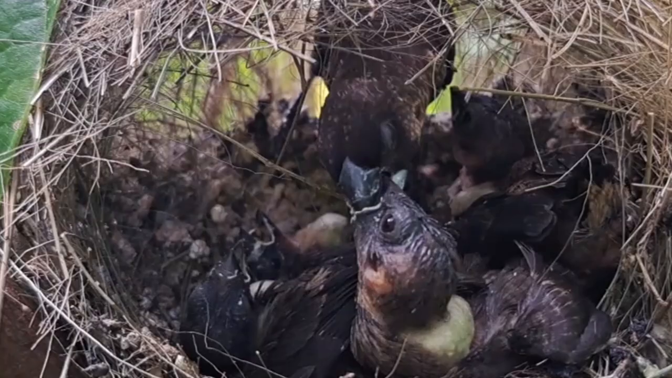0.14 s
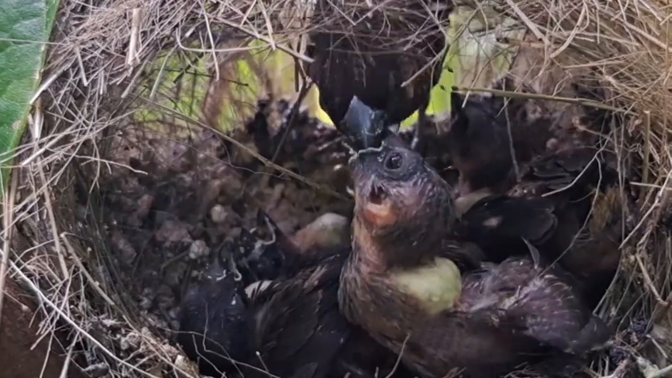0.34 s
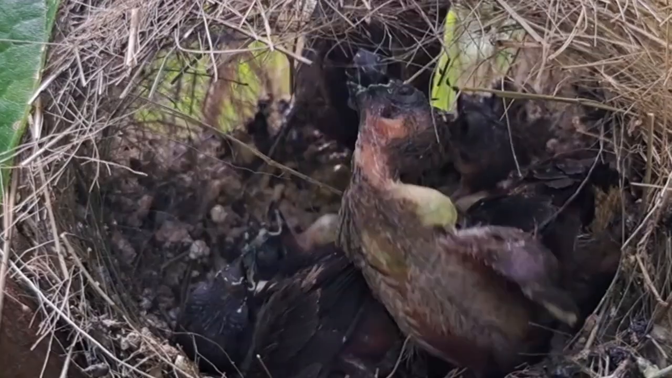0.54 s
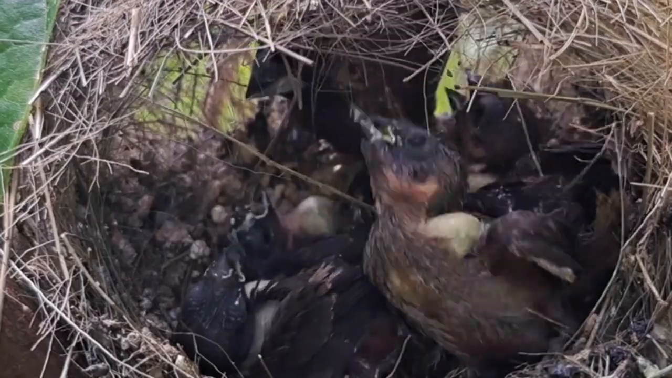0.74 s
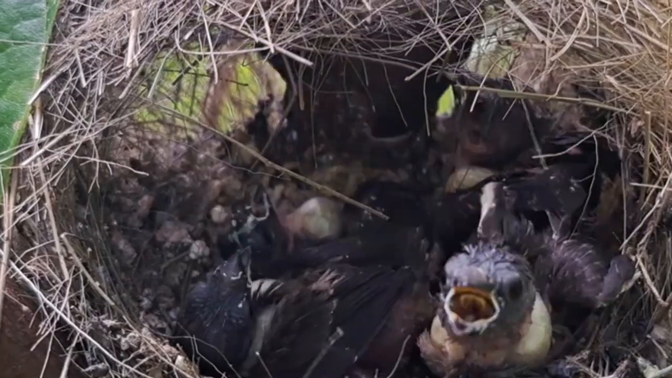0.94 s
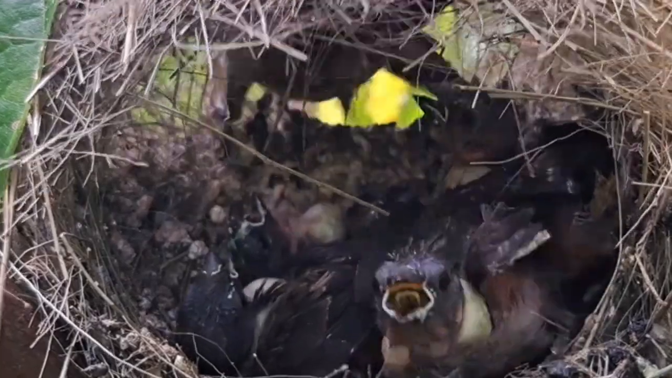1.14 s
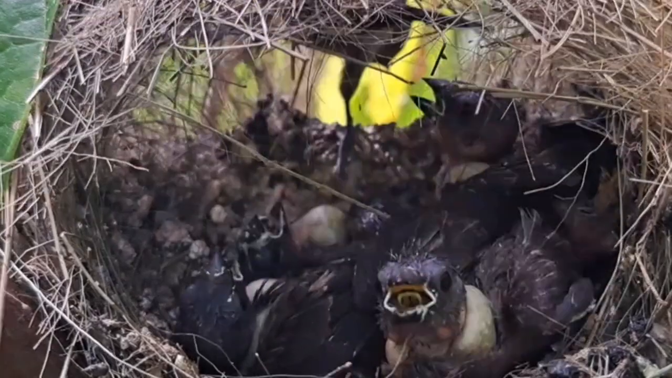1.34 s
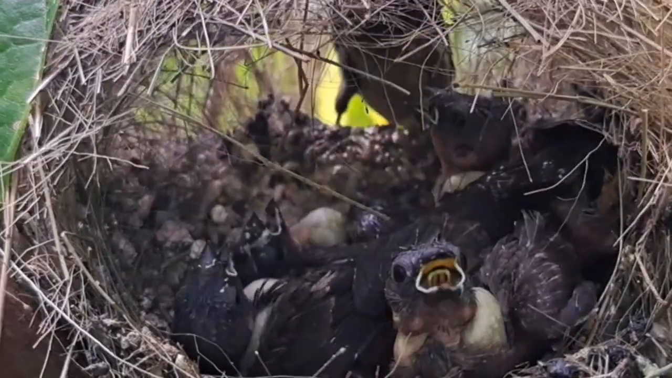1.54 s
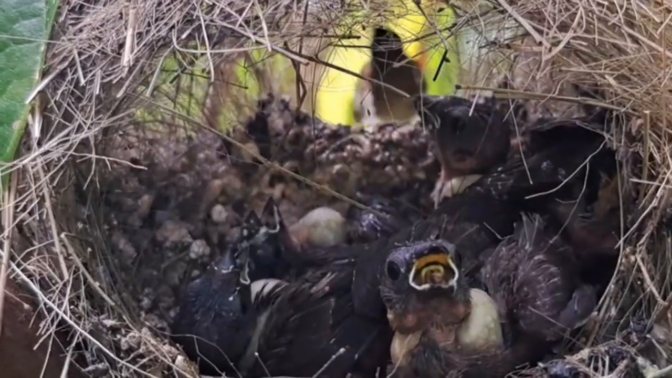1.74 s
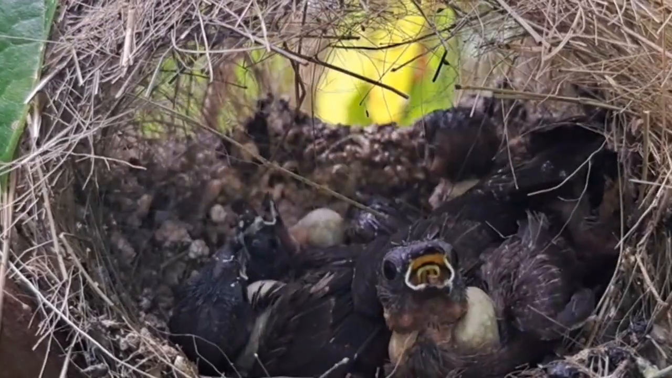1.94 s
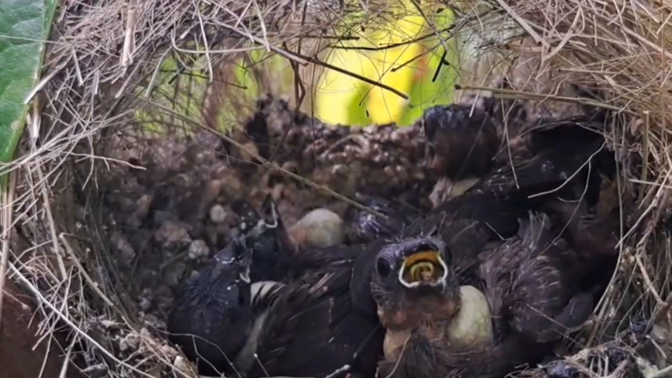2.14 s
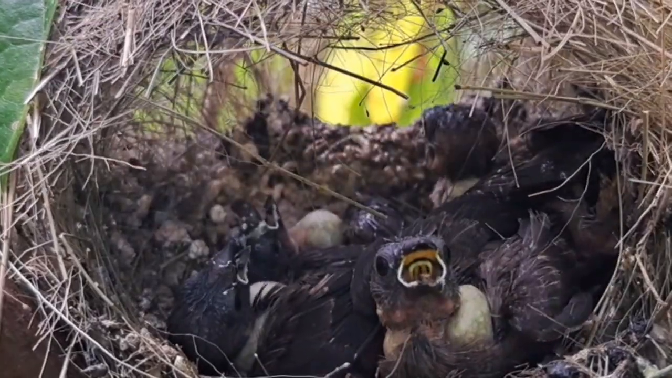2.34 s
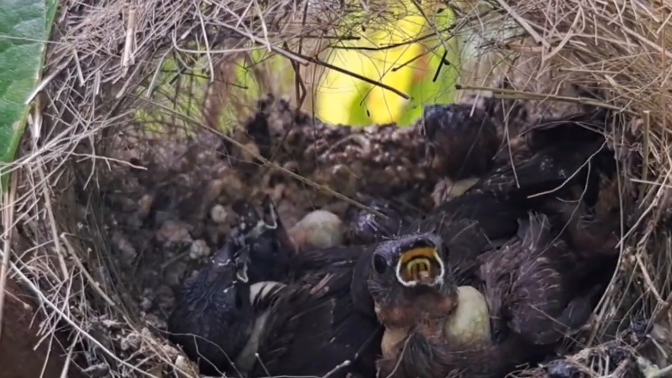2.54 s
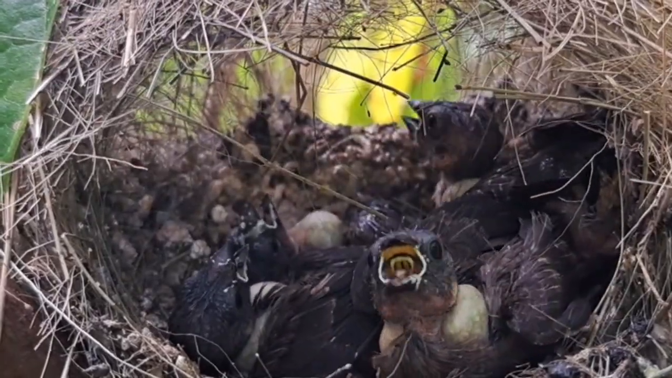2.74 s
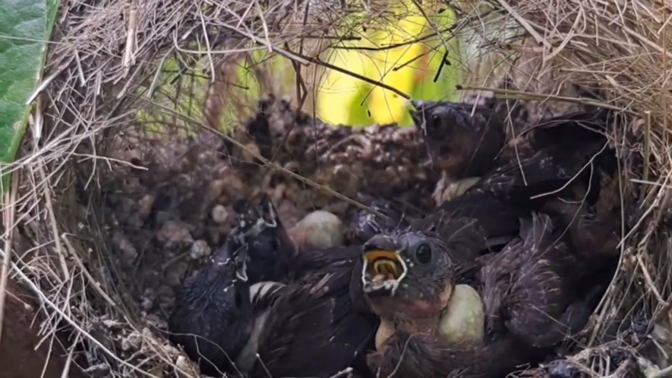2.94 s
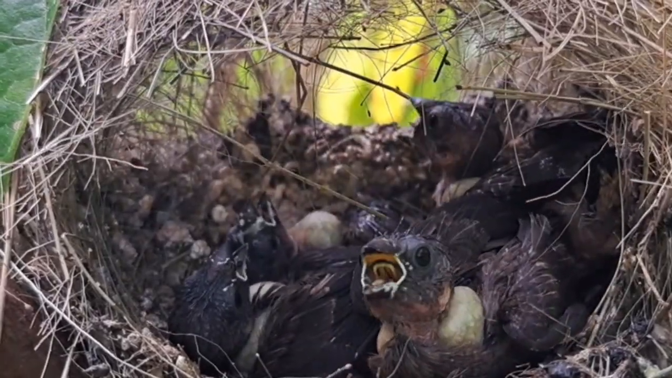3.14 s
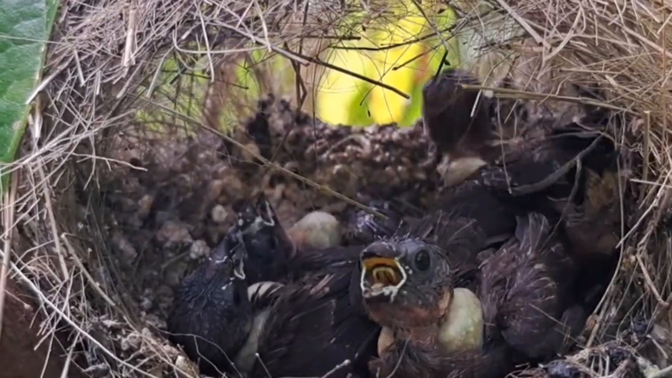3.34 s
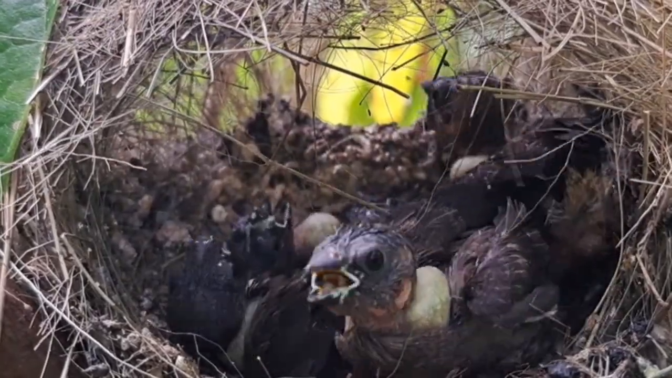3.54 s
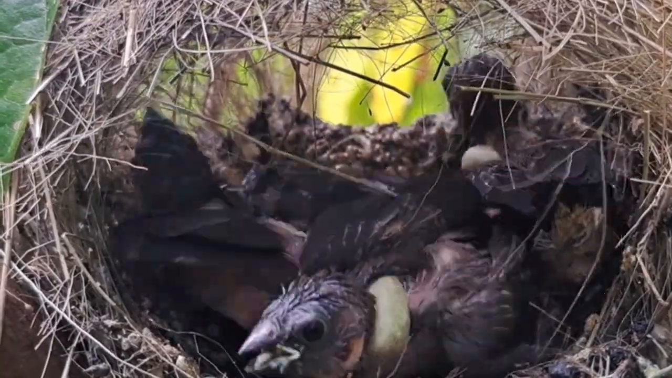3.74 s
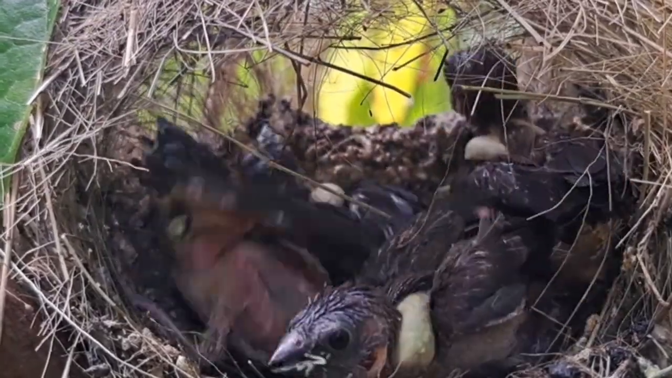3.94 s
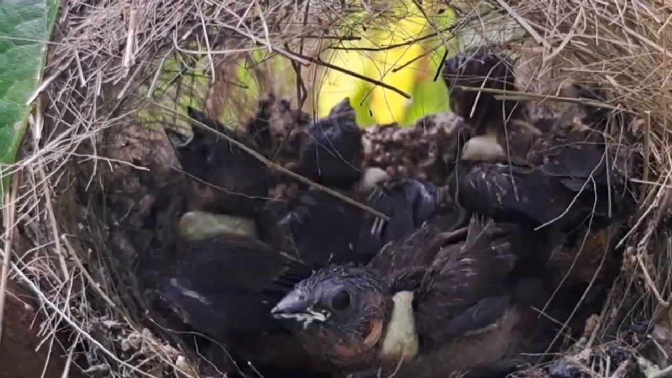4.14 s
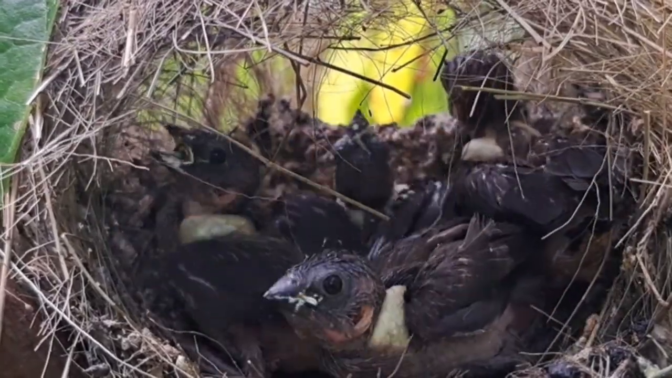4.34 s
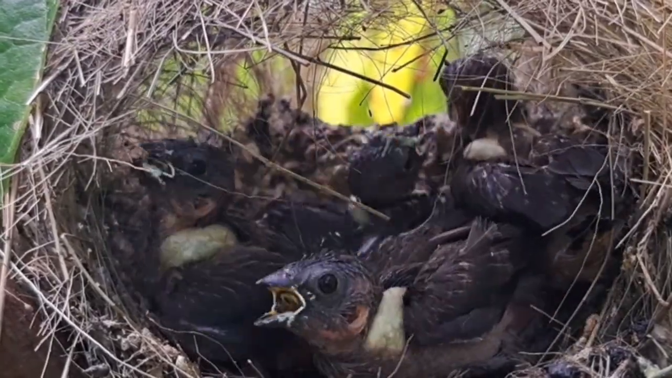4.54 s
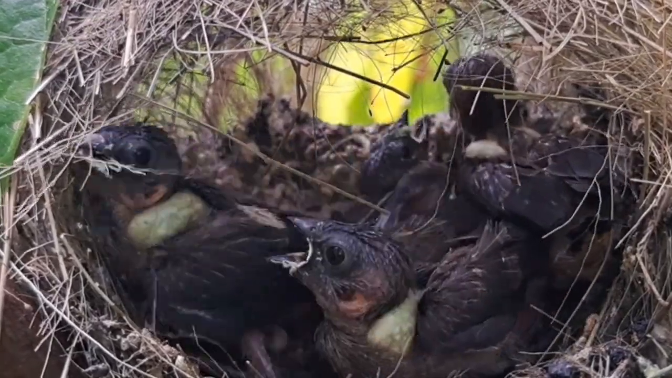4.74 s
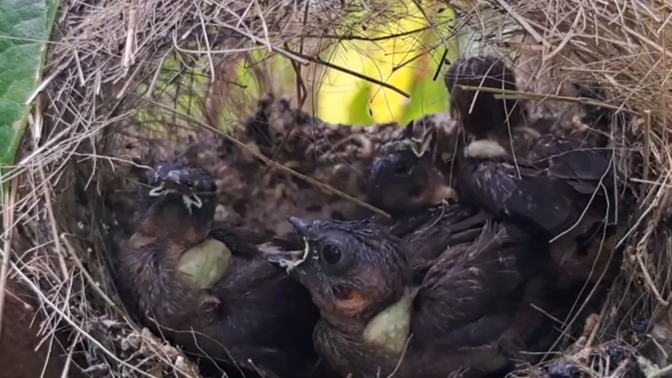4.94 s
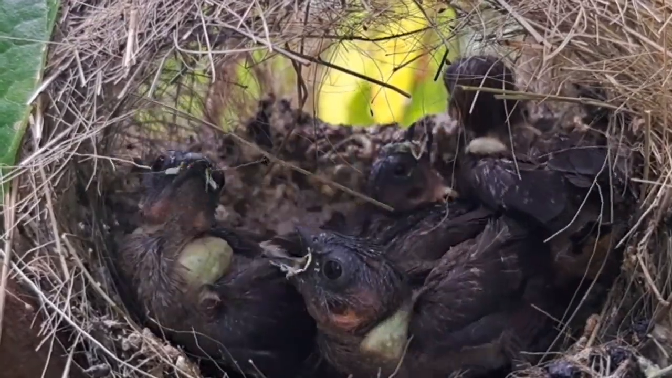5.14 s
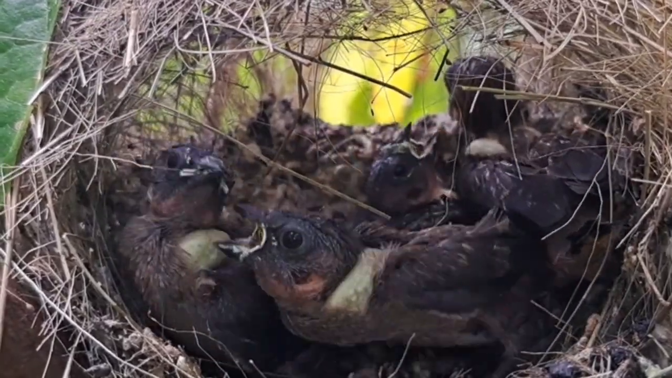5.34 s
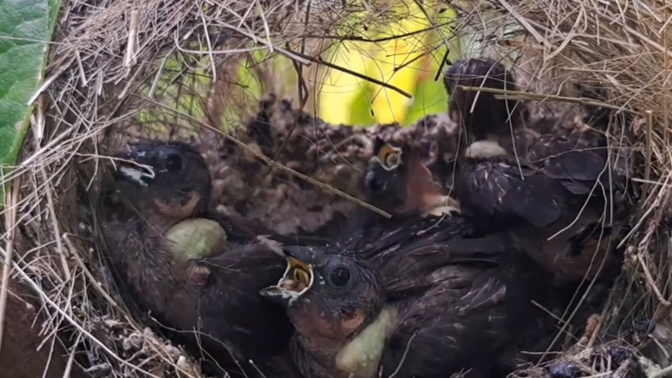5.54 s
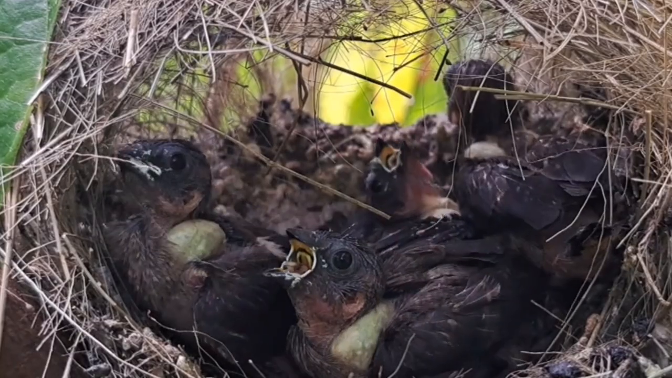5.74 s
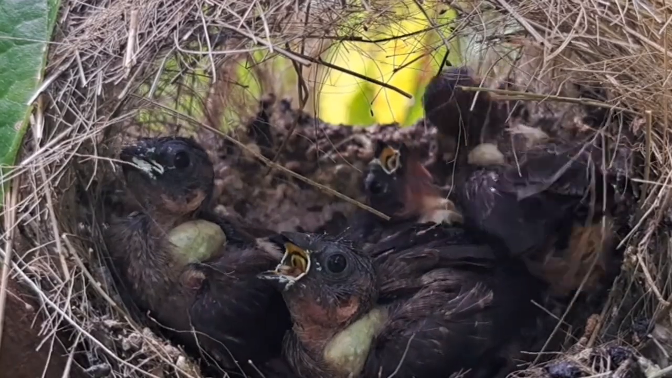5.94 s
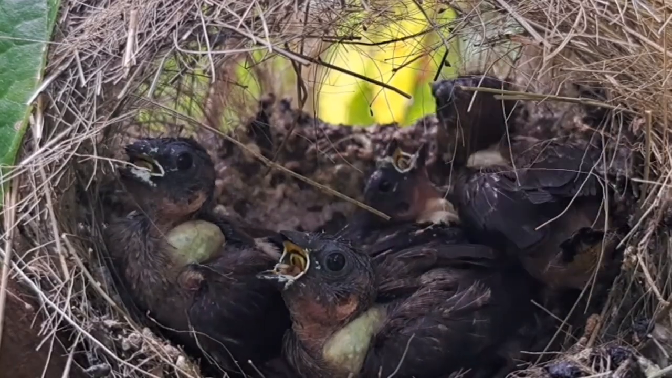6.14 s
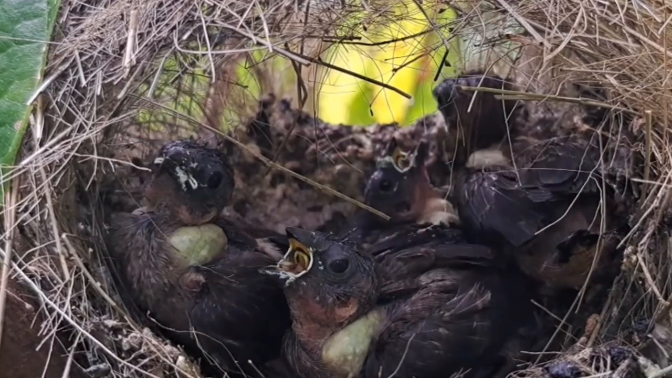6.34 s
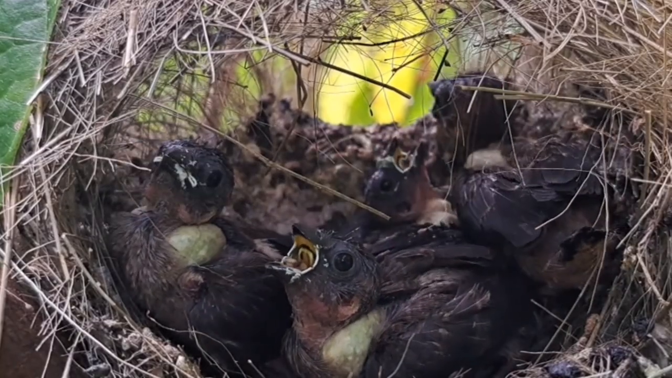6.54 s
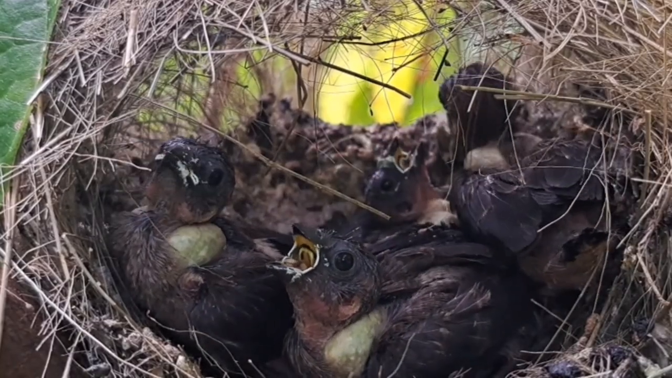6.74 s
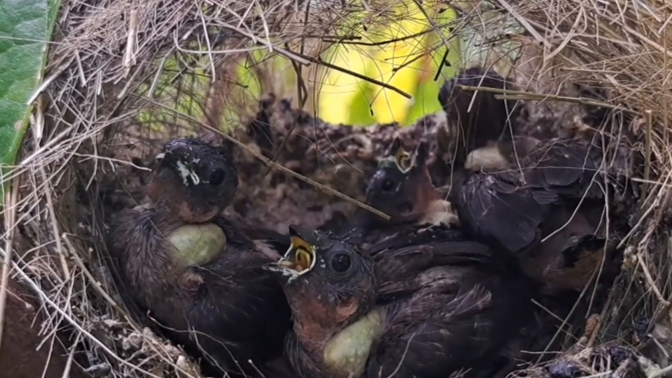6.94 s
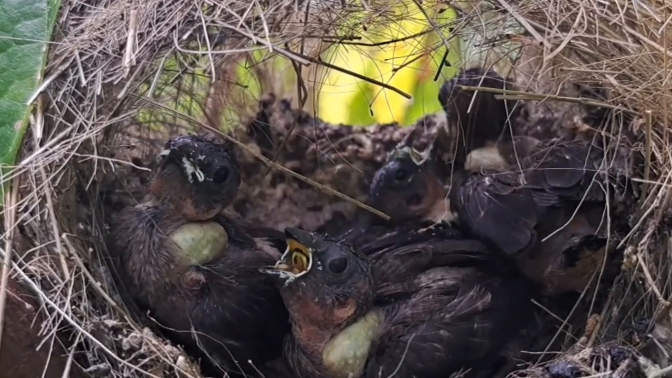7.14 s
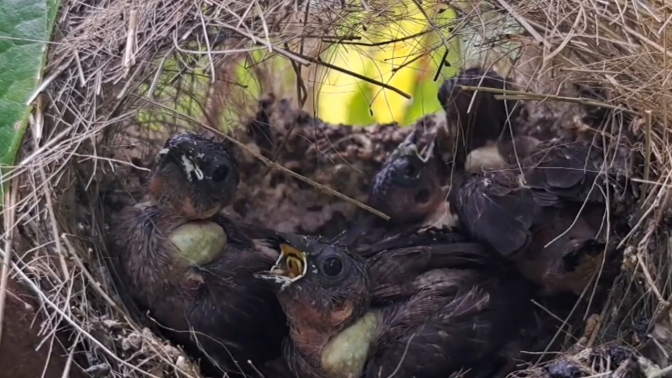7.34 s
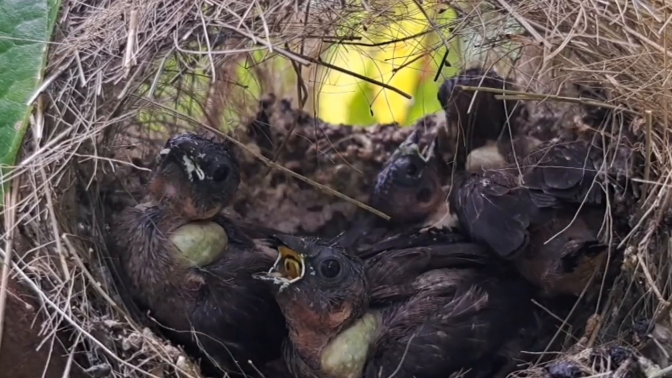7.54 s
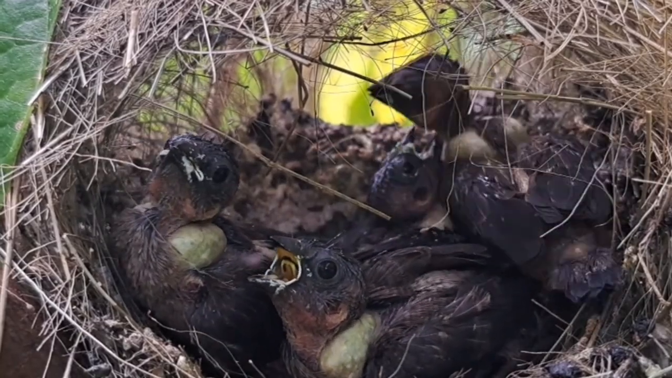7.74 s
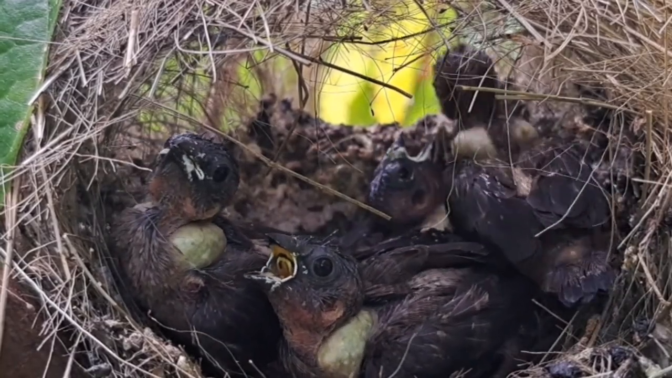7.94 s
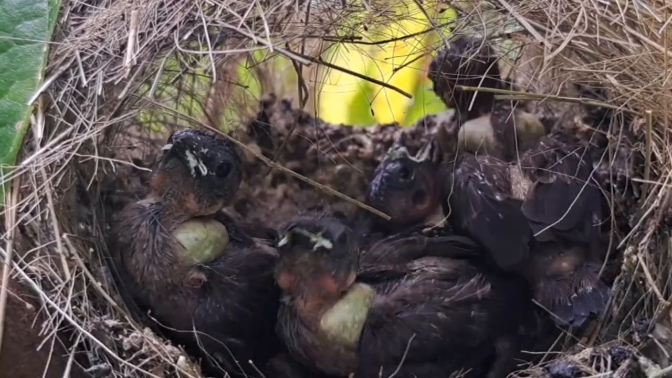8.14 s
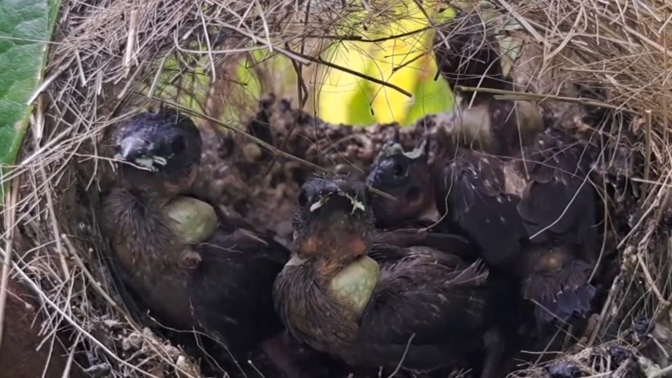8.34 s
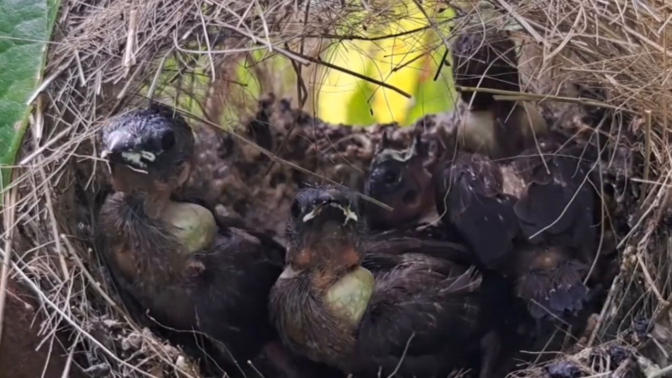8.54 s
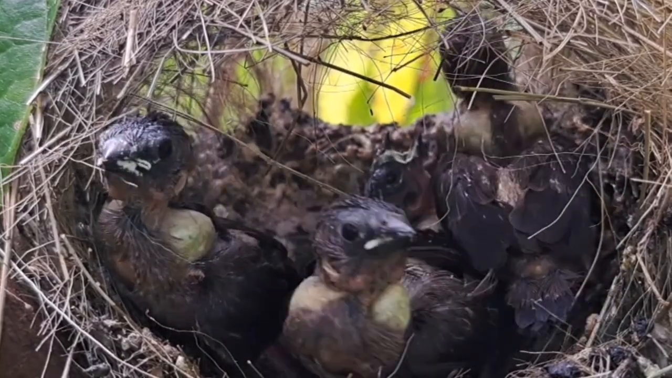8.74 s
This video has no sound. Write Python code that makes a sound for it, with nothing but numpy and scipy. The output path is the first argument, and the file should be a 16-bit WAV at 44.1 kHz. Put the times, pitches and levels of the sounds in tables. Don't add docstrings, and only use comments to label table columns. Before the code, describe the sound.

Very close stereo sound inside a grass nest: hungry chicks give shrill, quick rising whistles, clear and hoarse voices overlapping densely for two seconds. They drop to tiny faint peeps amid soft low knocks, then loud calls burst back briefly. Cracked, raspy chirps follow, and later one bright chick calls strongly between small peeps. Cicada pulsing, thin insect bands and low wind and traffic rumble lie behind.

```python
import sys
import numpy as np
from scipy import signal
from scipy.fft import rfft, irfft, next_fast_len
from scipy.io import wavfile
from scipy.ndimage import uniform_filter1d, minimum_filter1d, map_coordinates

SR = 44100
rng = np.random.default_rng(int(sys.argv[2]) if len(sys.argv) > 2 else 0)


def log_audio(samples):
    frames = np.atleast_2d(samples).T
    limited = np.clip(frames, -1, 1)
    pcm = np.round(limited * 32767).astype(np.int16)
    wavfile.write(sys.argv[1], SR, pcm)


def ratio(d):
    e = np.asarray(d, float) / 20
    return 10 ** e


N = 388080


def unit(x):
    return x / np.sqrt(np.mean(x ** 2) + 1e-20)


def along(points, hz):
    point_hz, value = np.transpose(points)
    return np.interp(np.log(hz + 1), np.log(point_hz + 1), value, left=value[0], right=value[-1])


def curve(rows):
    return np.interp(np.arange(N) / SR, *np.transpose(rows))


def wobble(rate_hz, size=N):
    knots = rng.standard_normal(int(size * rate_hz / SR) + 4)
    return map_coordinates(knots, [np.arange(size) * rate_hz / SR], order=2)


def filtered(x, response):
    m = next_fast_len(N + SR // 2)
    return irfft(rfft(x, m) * response(np.fft.rfftfreq(m, 1 / SR)), m)[..., :N]


def rush(spectrum):
    # frequency in Hz, left-right likeness 0-1.
    alike = [(60, .27), (290, 0.47), (700, 0.067), (1400, 0.01)]
    # frequency in Hz, left minus right in dB.
    lean = [(40, -6), (200, -1), (500, -0.5)]

    def mid_side(hz):
        turn_rad = np.arccos(np.clip(along(alike, hz), -1, 1)) / 2
        return ratio(along(spectrum, hz)) * [np.cos(turn_rad), np.sin(turn_rad)]

    def balance(hz):
        return ratio(np.outer([.5, -.5], along(lean, hz)))

    mid, side = filtered(rng.standard_normal((2, N)), mid_side)
    return unit(filtered(np.array([mid + side, mid - side]), balance))


def outdoors():
    # time in s, rumble level in dB.
    rumble_db = [(0.0, -35), (1.49, -41.5), (1.96, -35.5), (3.16, -39.5), (5.24, -32), (8.8, -36)]
    # frequency in Hz, density in dB per Hz.
    rumble_spectrum = [(12, -52.5), (20, -22), (53, 4), (248, -9.5), (290, -12.5), (387, -17),
                       (1200, -47.5), (1560, -81.5), (2640, -120)]
    # frequency in Hz, density in dB per Hz.
    air_spectrum = [(700, -5.5), (1500, -7), (3000, -7), (6000, -13.5), (11000, -11.5), (15400, -20.5)]
    lumps = ratio(1.5 * wobble(8) + 4.0 * np.array([wobble(19), wobble(34)]))
    rumble = unit(lumps * rush(rumble_spectrum + [(1600, -120)]))
    hiss = ratio(-55.5) * rush([(400, -120)] + air_spectrum)
    return ratio(curve(rumble_db) + 1.0) * rumble + hiss


def chorus():
    # centre in Hz, width in Hz, level in dB.
    bands = [(8300, 100, -72), (11300, 330, -66.5)]

    def fuzz(centre_hz, width_hz):
        noise = rng.standard_normal((2, N))
        return unit(filtered(noise, lambda f: np.exp(-.5 * ((f - centre_hz) / width_hz) ** 2)))

    phrase = np.exp(-((np.arange(N) / SR - 2.7) / .4) ** 2)
    out = ratio(-60) * phrase * fuzz(3400, 220)
    for centre_hz, width_hz, db in bands:
        out = out + ratio(db + 7.3 * wobble(1.4)) * fuzz(centre_hz, width_hz)
    return out


def cicada(rate_hz=73, body_hz=4830, width_hz=300):
    # time in s, level in dB.
    swell_db = [(0, -40.5), (2.4, -50), (2.55, -75), (3.0, -53), (3.15, -50), (4.4, -55), (4.9, -46.5),
                (6.45, -64), (6.75, -48), (7.05, -56), (7.42, -68), (7.6, -49.5), (8.8, -50)]
    cycle = np.cumsum(rate_hz * (1 + 0.16 * wobble(30))) / SR
    buckle = (.5 + .5 * np.cos(2 * np.pi * cycle)) ** 2 * ratio(3 * wobble(70)) + .6
    pulses = buckle * (rng.standard_normal(N) + 0.43 * rng.standard_normal((2, N)))
    body = filtered(pulses, lambda f: np.exp(-.5 * ((f - body_hz) / width_hz) ** 2))
    return ratio(curve(swell_db)) * unit(body)


def jolts():
    # start in s, peak in dB.
    knocks = [
        (2.266, -18),
        (2.293, -20),
        (2.631, -20.5),
        (3.847, -23),
        (5.275, -15),
        (5.936, -19),
    ]
    thump, puff, t = np.zeros(N + SR), np.zeros(N + SR), np.arange(SR // 5) / SR
    for start_s, db in knocks:
        first = round(start_s * SR)
        fade = ratio(db - 60 * t / 0.19) * (1 - np.exp(-t / 0.0043))
        thump[first:][:len(t)] += fade * np.sin(2 * np.pi * 56 * t)
        puff[first:][:len(t)] += fade
    push = filtered(puff[:N] * rng.standard_normal((2, N)), lambda f: 3 / (1 + (f / 250) ** 4))
    since_s = np.arange(N) / SR - 1.962
    beat = ratio(-39) * np.exp(-(since_s / 0.083) ** 2) * np.cos(np.pi * 28.5 * since_s) ** 2
    rustle = filtered(beat * rng.standard_normal(N), lambda f: 3 * np.exp(-((f - 900) / 500) ** 2))
    return (thump[:N] + push) * ratio(np.array([[-3], [3]])) + rustle * ratio(np.array([[3], [-7]]))


def bushes(x, t60_s=0.19):
    t = np.arange(SR // 2) / SR
    tail = rng.standard_normal((2, len(t))) * ratio(-60 * t / t60_s) * (t > .004)
    return signal.fftconvolve(x, tail / np.linalg.norm(tail[0]), axes=1)[:, :N]


def walls(x):
    delay_s = rng.uniform(0.000399, 0.00397, (2, 5))
    gain = ratio(-10.5) * rng.choice([-1, 1], (2, 5)) * np.exp(-delay_s / 0.007)

    def echoes(hz):
        return 1 + (gain[..., None] * np.exp(-2j * np.pi * delay_s[..., None] * hz)).sum(1)

    return filtered(x, echoes)


def glide(start_s, length_s, first_hz, top_hz, db, gape, climb, bow):
    u = np.arange(13) / 12
    effort = np.minimum(u / climb, 1)
    hz = first_hz + (top_hz - first_hz) * (effort + bow * np.sin(np.pi * effort))
    return np.transpose([start_s + length_s * u, hz, db + along(gape, hz)])


def call(rows, octave_db, doubled, lag, hoarse_db):
    # multiple of the pitch, level in dB.
    doubled_partials = [(.5, -10), (1.5, -9.5), (2.5, -15)]
    # frequency in Hz, gain in dB.
    throat = [(1500, -4), (2300, 4.5), (8500, 6), (12500, -9.5), (15500, -20)]
    s, hz, db = np.transpose(rows)
    hz = np.maximum.accumulate(hz)
    rise_s, fall_s, hoarse = .011, .017, ratio(hoarse_db)

    s_all = np.r_[s[0] - rise_s, s[0] - .4 * rise_s, s, s[-1] + .4 * fall_s, s[-1] + fall_s]
    hz_all = np.r_[.55 * hz[0], .9 * hz[0], hz, .97 * hz[-1], .68 * hz[-1]]
    db_all = np.r_[db[0] - 30, db[0] - 9, db, db[-1] - 2.5, db[-1] - 24]
    first = int(s_all[0] * SR)
    t = np.arange(first, int(s_all[-1] * SR)) / SR
    n = len(t)
    pitch_hz = np.minimum(np.interp(t, s_all, hz_all), 5880)
    pitch_hz = uniform_filter1d(pitch_hz, size=130)

    step_cycle = np.cumsum(50 + 15 * wobble(30.65, n)) / SR
    steps = np.sin(2 * np.pi * step_cycle + rng.uniform(0, 2 * np.pi))
    unsteady = (.007 + .1 * hoarse) * (steps + .5 * wobble(150, n))
    pitch_hz *= 1 + unsteady + .003 * wobble(500, n)
    shake_db = 1.2 * wobble(93.4, n) + (0.22 + 15 * hoarse) * wobble(350, n)
    size = ratio(np.interp(t, s_all, db_all) + shake_db) * np.sqrt(2)

    cycle = (np.cumsum(pitch_hz) - np.outer([0, lag], pitch_hz)) / SR
    phase = 2 * np.pi * cycle + 1.8 * hoarse * wobble(3000, n)

    split_end_s = s[0] + doubled * (s[-1] - s[0])
    split = np.clip((split_end_s - t) / 0.0043, 0, 1) * (doubled > 1 / 10)
    fresh = np.exp(-((t - t[0]) / 0.0593) ** 2)
    parts = [(2, ratio(octave_db)), (3, ratio(0.27 * octave_db - 6.5) * fresh)]
    parts += [(k, ratio(d) * split) for k, d in doubled_partials]
    late = np.clip((t - t[0]) / (t[-1] - t[0]) * 3 - 1.2, 0, 1)
    strain = 1.5 * hoarse * late * (doubled < .3) * (hoarse > 1 / 20)
    parts += [(.76, strain), (1.3, strain)]

    slack = np.exp(-np.clip(t - s[-1], 0, 1) / 0.0053)
    tone = np.sin(phase)
    for k, gain in parts:
        if not np.any(gain):
            continue
        flutter = ratio(along(throat, k * pitch_hz) + 1.8 * wobble(61.0, n)) * (k * pitch_hz < SR / 2)
        tone = tone + gain * flutter * slack * np.sin(k * phase + rng.uniform(0, 2 * np.pi))

    gasp = 0.061 * np.exp(-((t - t[0]) / rise_s - .6) ** 2 * 4) * size.max()
    leak = hoarse * size ** 0.43 * size.max() ** 0.36
    return first, size * tone, (leak + gasp) * ratio(2.2 * wobble(120, n))


def nestlings():
    # start in s, length in s, first pitch in Hz, top pitch in Hz,
    # level in dB before the gape.
    loud_calls = [(-.06, 0.092, 4120, 5790, -5), (.284, 0.045, 4590, 5470, -9),
                  (.362, 0.032, 4820, 5840, -3.5), (.545, 0.11, 4016, 5880, -6),
                  (.758, 0.097, 4280, 5840, -5), (.962, 0.096, 4104, 5810, -5.5),
                  (1.193, .1, 3940, 5850, -4.5), (1.432, 0.09, 3950, 5840, -6),
                  (1.735, 0.095, 4200, 5830, -5), (2.07, .11, 4130, 5807, -5),
                  (3.503, .12, 4440, 5805, -6.5), (3.735, 0.098, 4160, 5800, -4),
                  (3.997, 0.097, 4090, 5840, -8), (4.25, 0.089, 4165, 5850, -8)]
    hoarse_calls = [(.13, 0.095, 3880, 5824, -10), (.432, 0.11, 3850, 5890, -7),
                    (.685, .12, 3900, 5840, -8), (.915, 0.11, 3860, 5795, -8.5),
                    (1.22, 0.1, 3970, 5800, -9.5), (1.525, 0.12, 3650, 5790, -9.5),
                    (1.945, .077, 3950, 5484, -13), (3.52, 0.11, 3700, 5570, -11),
                    (3.745, 0.12, 3840, 5640, -16.5), (4.055, 0.12, 3860, 5490, -15.5)]
    cracked_calls = [(4.435, 0.075, 3900, 5480, -21), (4.6, 0.083, 3610, 5400, -21),
                     (4.785, 0.081, 3730, 5394, -21.5), (4.972, 0.12, 3595, 5790, -18),
                     (5.19, 0.077, 4065, 5340, -17.5), (5.355, .085, 3640, 5400, -17.5),
                     (5.538, 0.083, 3730, 5404, -15.5), (5.72, 0.079, 3630, 5450, -17),
                     (5.922, 0.072, 3595, 5440, -17.5)]
    small_calls = [(1.156, .059, 3784, 4780, -23), (2.463, .062, 3715, 4770, -31.5),
                   (2.69, .072, 3510, 5140, -26), (2.908, .074, 3550, 5160, -25.5),
                   (3.195, .067, 3620, 5020, -25.5), (3.44, .065, 3640, 5130, -20.5),
                   (3.642, .072, 3775, 5040, -20), (3.845, .07, 3710, 5060, -25.5),
                   (4.235, 0.05, 3700, 4700, -21.5), (5.79, .048, 3513, 5580, -26),
                   (6.155, .065, 3500, 5204, -19), (6.338, .072, 3600, 5254, -20),
                   (6.565, .068, 3514, 5080, -21.5), (6.8, .066, 3400, 5110, -22.5),
                   (7.055, .065, 3370, 4850, -24.5), (7.28, .06, 3580, 4815, -22.5),
                   (7.72, .058, 3594, 5050, -25.5), (7.935, .067, 3540, 4910, -24),
                   (8.198, .042, 3510, 4620, -33), (8.49, .045, 3506, 4955, -24.5),
                   (8.728, .037, 3440, 4780, -25.5)]
    bright_calls = [
        (5.462, 0.11, 4324, 5776, -9.5),
        (6.062, 0.12, 4590, 5795, -8.5),
        (7.102, 0.034, 4500, 5600, -14),
        (7.176, 0.043, 4760, 5780, -11),
        (7.808, 0.12, 4290, 5850, -7),
        (8.035, 0.093, 4293, 5846, -8.5),
        (8.302, .105, 4065, 5820, -10),
        (8.54, 0.093, 4150, 5800, -10),
        (8.79, 0.068, 4240, 5800, -7),
    ]
    hidden_calls = [
        (.49, .06, 3200, 3900, -19),
        (1.025, .085, 3700, 5250, -29),
        (1.3, .085, 3620, 5160, -27.5),
        (1.6, .056, 3640, 4400, -33),
        (1.832, .073, 3700, 5100, -23),
    ]
    # octave in dB, share of the call with doubled period 0-1, left minus right in dB,
    # right lag in samples, hoarseness in dB.
    loud_voice = (-27.5, 0, 1.55, 7.5, -36.5)
    hoarse_voice = (-14.5, 0, 4, 8.5, -21.5)
    cracked_voice = (-12.5, 0.45, 6, 9.5, -21.5)
    small_voice = (-13.5, 0.88, 7, 7.5, -22)
    bright_voice = (-13.5, 0, 2.5, 5, -34)
    hidden_voice = (-14.5, 0, 2.2, 4.5, -35.5)
    # pitch in Hz, gain in dB.
    loud_gape = [(4000, -11), (4400, -8.5), (4650, 0.5), (5300, 0), (5850, -2.5)]
    hoarse_gape = [(3800, -9.5), (4700, -6.5), (5200, -1.5), (5850, -2)]
    small_gape = [(3500, -14), (4300, -7.5), (4900, -1), (5500, 0)]
    bright_gape = [(4200, -3), (4500, -7.5), (5200, -5), (5800, -1)]
    # frequency in Hz, density in dB per Hz.
    breath_spectrum = [(900, -48.5), (1500, -4.5), (2400, 4), (2900, -19.5), (4500, 5), (7500, 7.5),
                       (12000, -11.5), (15500, -28)]
    brood = [(loud_calls, loud_voice, loud_gape, .9, -.03),
             (hoarse_calls, hoarse_voice, hoarse_gape, .93, .02),
             (cracked_calls, cracked_voice, small_gape, 0.97, 0.055),
             (small_calls, small_voice, small_gape, 0.98, 0.044),
             (bright_calls, bright_voice, bright_gape, .88, -0.027),
             (hidden_calls, hidden_voice, hoarse_gape, 0.94, .03)]

    pad = SR
    voices, flow = np.zeros((2, N + 2 * SR)), np.zeros(N + 2 * SR)
    for calls, (octave_db, doubled, pan_db, lag, hoarse_db), gape, climb, bow in brood:
        pan = ratio(np.array([[.5], [-.5]]) * pan_db)
        for row in calls:
            rows = glide(*row, gape, climb, bow)
            first, tone, air = call(rows, octave_db, doubled, lag, hoarse_db)
            voices[:, pad + first:][:, :len(air)] += tone * pan
            flow[pad + first:][:len(air)] += air

    def breath(hz):
        lag_turn = np.exp(-2j * np.pi * np.outer([0, 8], hz) / SR)
        return ratio(along(breath_spectrum, hz) + np.array([[-2], [-10]])) * lag_turn

    puff = flow[pad:pad + N] * (rng.standard_normal(N) + 0.71 * rng.standard_normal((2, N)))
    return voices[:, pad:pad + N] + filtered(puff, breath)


def scene():
    birds = walls(nestlings())
    return outdoors() + chorus() + cicada() + jolts() + ratio(-21) * bushes(birds) + birds


def top_cut(x):
    return signal.sosfilt(signal.butter(12, 15550, fs=SR, output="sos"), x)


def record(dry):
    need = np.minimum(1, 0.99 / (np.abs(dry).max(0) + 1e-9))
    gain = uniform_filter1d(minimum_filter1d(need, size=401), size=201)
    return top_cut(filtered(dry * gain, lambda hz: hz < 15500))


dry = scene()
out = record(dry)
log_audio(out)
```